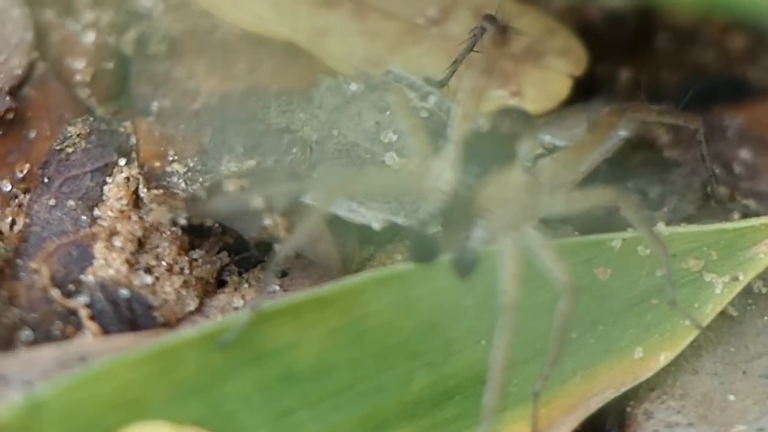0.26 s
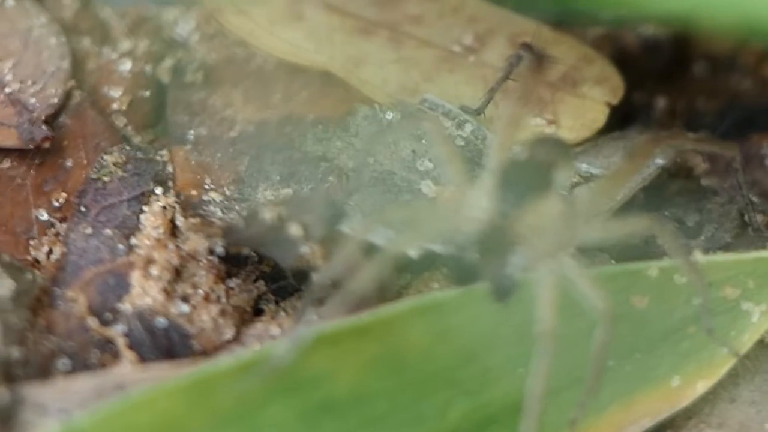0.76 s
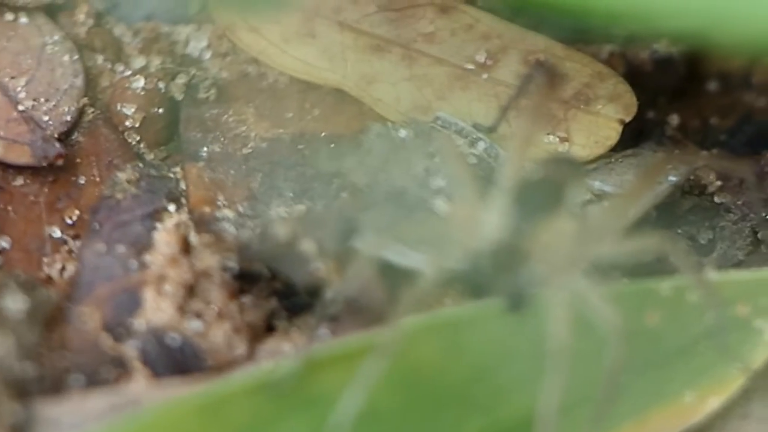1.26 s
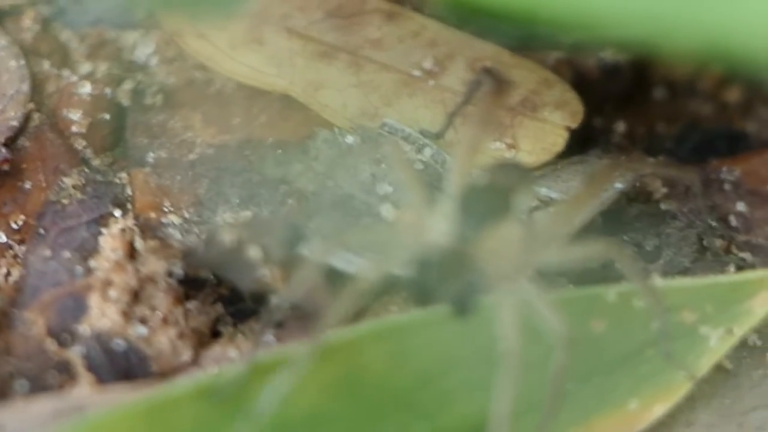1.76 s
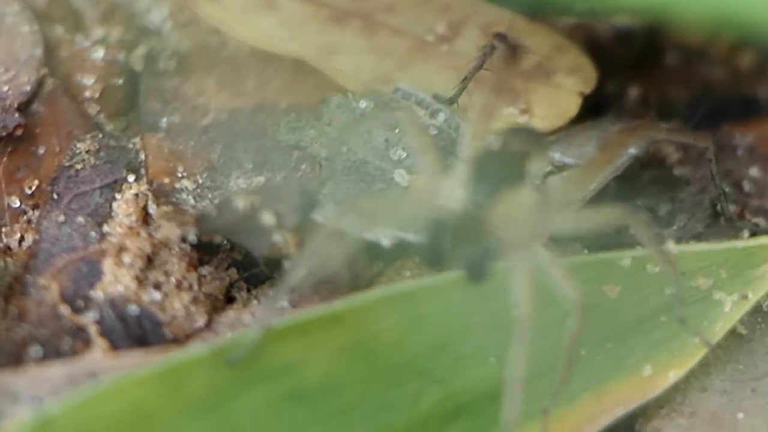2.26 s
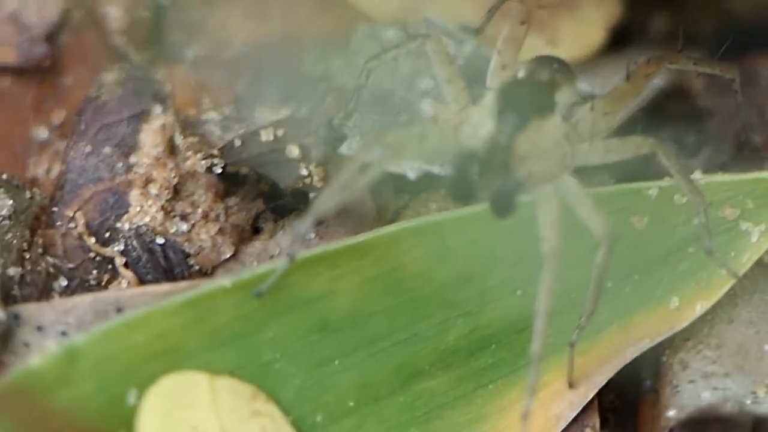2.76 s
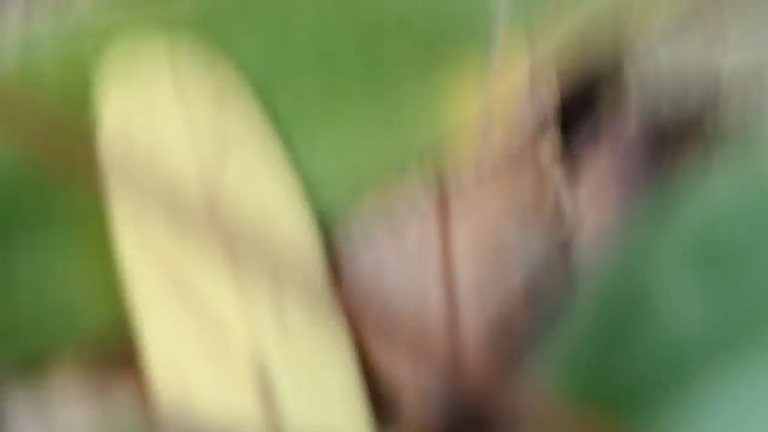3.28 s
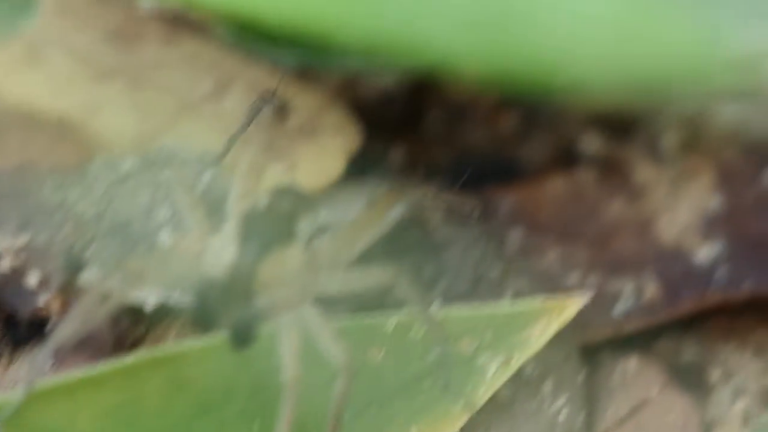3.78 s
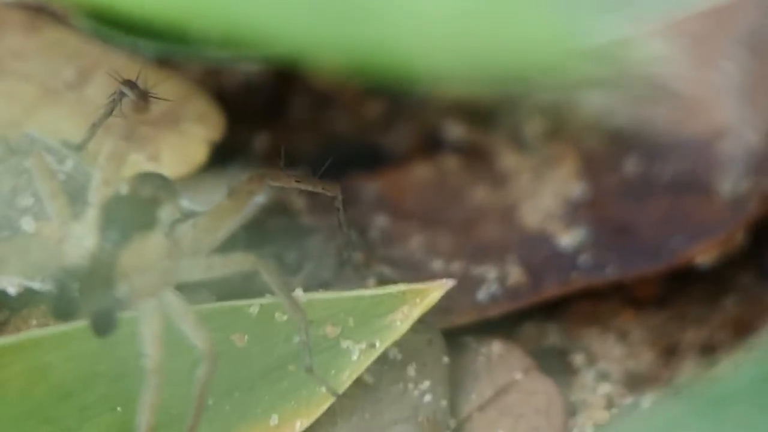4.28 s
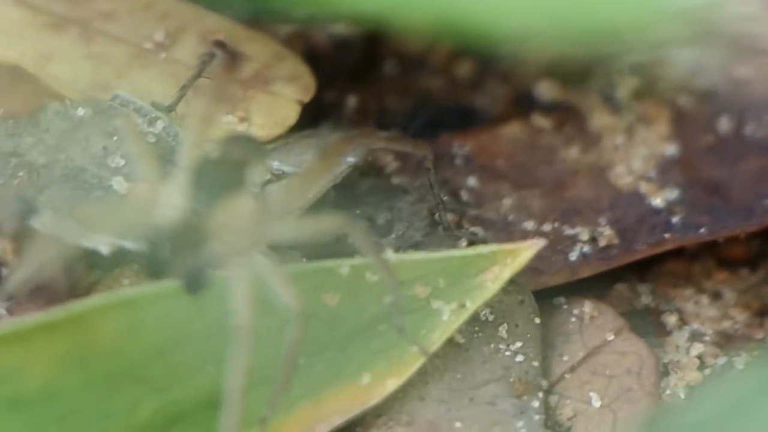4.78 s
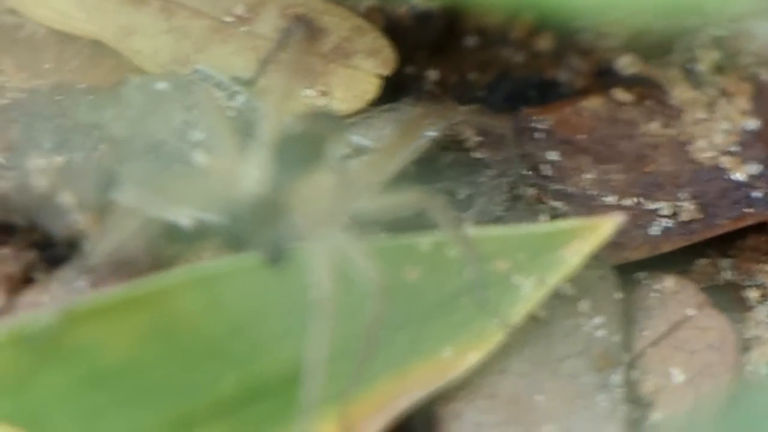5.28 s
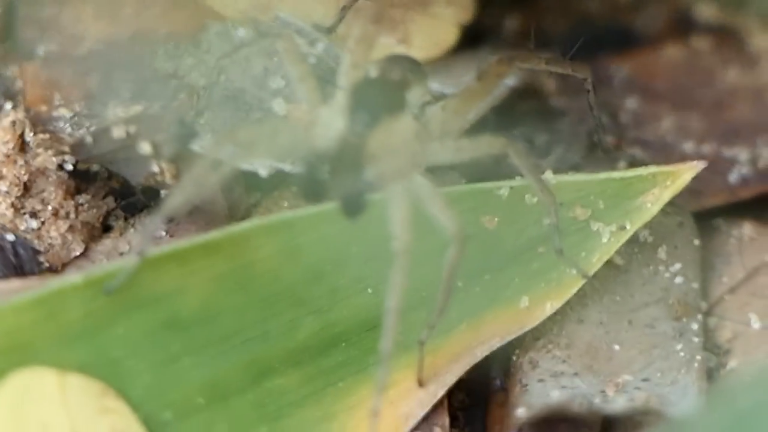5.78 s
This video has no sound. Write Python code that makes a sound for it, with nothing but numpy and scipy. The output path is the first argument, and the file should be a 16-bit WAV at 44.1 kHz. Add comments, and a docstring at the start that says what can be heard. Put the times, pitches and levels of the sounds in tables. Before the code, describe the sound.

Among leaf litter and trees, several layers of insects shimmer at high pitch without pause. Over them a mellow bird call keeps returning at a regular pace, slightly echoing. Cricket chirps open the scene and come back near the close. The camera body snaps, ticks and creaks very close to the microphone, mostly after three seconds, over low gentle wind puffs and a faint leafy hiss. The spider is silent.

```python
"""Three insect choirs shimmer at once, over a near cricket with paired falling chirps and a bird that
repeats a low five-note call. The choirs are noise pulsed by wing strokes; bird, cricket and two faint
short tones are sliding sines among echoing trees. The hand-held camera's plastic housing ticks and creaks
as cracks of noise through resonances, and its strap lug rings once as fading sines. Under it all light
wind rumbles and hums on the microphone, as shaped noise and low sines, with a hiss of far leaves."""
import sys
import numpy as np
from scipy import signal
from scipy.fft import rfft, irfft, next_fast_len
from scipy.io import wavfile
from scipy.ndimage import uniform_filter1d, map_coordinates

SR = 44100
rng = np.random.default_rng(int(sys.argv[2]) if len(sys.argv) > 2 else 0)


def file_out(sig):
    """Save sig as 16-bit WAV at sys.argv[1]."""
    # one column per channel
    cols = np.atleast_2d(sig).T
    # limit, then scale
    lim = np.clip(cols, -1, 1)
    pcm = np.round(lim * 32767).astype(np.int16)
    wavfile.write(sys.argv[1], SR, pcm)


N = 266364

# wing resonances, the relative colour of each choir: pitch_hz, level_db (per Hz)
LOW_WING_COLOUR = [(4000, -57), (4350, 2.5), (4750, 7), (5000, 15), (5250, 8), (5500, -32), (6000, -28)]
MAIN_WING_COLOUR = [(3180, -100.5), (5400, -13.5), (5830, -3), (6450, 2), (7120, 4.5), (7550, 1),
                    (7880, -3.5), (8000, -39), (8200, -44), (10700, -56), (18000, -120)]
HIGH_WING_COLOUR = [(4000, -40), (5000, -14), (8500, -18), (9120, 3.5), (9690, 6.5), (10200, 1.5),
                    (10800, -11.5), (14000, -58), (22000, -120)]
# swells of the low choir over its floor: centre_s, level_db
LOW_CHOIR_SWELLS = [(.2, -67), (.85, -65), (1.453, -64), (2.1, -72), (2.704, -67), (3.561, -66),
                    (4.24, -70), (5.021, -66), (5.747, -69)]
LOW_FLOOR_DB, SWELL_HALF_S = -65.5, .11
MAIN_DB = -52
# the high choir waxes and wanes around its middle level
HIGH_MIDDLE_DB, SWING_DB, SWING_PERIOD_S, CREST_S = -65.5, 2, 1.5, 1.1


def choirs():
    """Three kinds of insect: noise pulsed at a stroke rate, then coloured by the wing's resonance."""
    swells = bumps([(s, db, SWELL_HALF_S) for s, db in LOW_CHOIR_SWELLS])
    low = (amp(LOW_FLOOR_DB) + swells) * rush(LOW_WING_COLOUR, 3.0, wing_beat(150, 0.67, 0.94))

    main_gain = amp(MAIN_DB + 0.37 * wobble(8.9))
    main = main_gain * rush(MAIN_WING_COLOUR, 1.0, wing_beat(56.0, 1.0, 1.0))

    swing = np.cos(2 * np.pi * (np.arange(N) / SR - CREST_S) / SWING_PERIOD_S)
    high_gain = amp(HIGH_MIDDLE_DB + SWING_DB * swing + 0.37 * wobble(9.2))
    high = high_gain * rush(HIGH_WING_COLOUR, 0.94, wing_beat(272, 0.51, 1.3))
    return low + main + high


def wing_beat(rate_hz, depth_db, grain_db):
    """One near singer's almost steady stroke rate over the random teeth of the crowd."""
    phase = 2 * np.pi * np.cumsum(rate_hz * (1 + 0.0067 * wobble(2.7))) / SR
    return amp(depth_db * np.sin(phase) + grain_db * wobble(500))


# bird calls: first_note_s (its centre), level_db, tail_db (added per note after the second)
BIRD_CALLS = [(-0.082, -32.5, 1), (0.667, -33.5, 1), (1.436, -34, 1.5), (2.197, -32.5, 1),
              (2.962, -34.5, -0.5), (3.743, -34, 1), (4.521, -35, 1.2), (5.298, -33, -0.1)]
# the five notes: delay_s, level_db (added to the call), then the shape before variation:
# rise_s, fall_s, centre_hz, slide_hz_per_s, arch_hz (lost at the half-level ends)
FIVE_NOTES = [(0, -5, 0.019, 0.014, 1085, 303, 26), (.093, -1, 0.0062, 0.013, 1157, -6000, 14.5),
              (.14, -0.5, 0.0054, 0.0098, 1169, -5500, 15), (.184, -5, 0.006, 0.0078, 1159, -5500, 16.3),
              (.224, -12.5, 0.0073, 0.0049, 1098, -3000, 14.5)]
# after the fifth note: delay_s, level_db (added to that note), rise_s, fall_s, centre_hz,
# slide_hz_per_s, arch_hz
CLOSING_FLOURISH = [(.03, -15.5, 0.01395, .012, 1534, -4000, 22.3),
                    (.058, -13, .01, 0.008, 1288, -6000, 10.7)]
# a very faint short breathy tone before the third note: lead_s, level_db, rise_s, fall_s, centre_hz,
# slide_hz_per_s, arch_hz
FAINT_BLIP = (0.019, -57, .004, .005, 1560, 3000, 5)


def bird():
    """The throat whistles five notes, a little different each time, with a faint blip and a flourish."""
    spread = [.06, .06, .006, .09, .2]  # of rise, fall, pitch, slide and arch
    vary = 1 + spread * rng.standard_normal((len(BIRD_CALLS), len(FIVE_NOTES), 5))
    notes = []
    for c, (s, db, tail_db) in enumerate(BIRD_CALLS):
        for k, (delay, note_db, *shape) in enumerate(FIVE_NOTES):
            level = db + note_db + tail_db * max(k - 1, 0)
            notes.append((s + delay, level, *(shape * vary[c, k])))

    thirds, fifths = notes[2::len(FIVE_NOTES)], notes[len(FIVE_NOTES) - 1::len(FIVE_NOTES)]
    flourishes = [(s + delay, db + more_db, *shape)
                  for s, db, *_ in fifths for delay, more_db, *shape in CLOSING_FLOURISH]
    lead, *blip = FAINT_BLIP
    blips = [(s - lead, *blip) for s, *_ in thirds]
    return whistles(notes + flourishes + blips, overtone_db=-32.5, rough_db=1.9, breath_db=-31.5)


# chirps of two wing closures: time_s, level_db (midway between the two), gap_s (to the second),
# second_over_first_db, first_pitch_hz (where the first closure starts)
CRICKET_CHIRPS = [(-.024, -37, 0.019, -1, 4920), (0.081, -35.5, 0.02, 1, 4920),
                  (.191, -34.5, 0.024, 1, 4910), (0.323, -37, .026, 1.5, 4900),
                  (0.426, -34.5, 0.022, -0.5, 4950), (0.532, -34.5, 0.026, 0, 4980),
                  (0.653, -34, 0.022, 1.5, 4914), (5.355, -53, 0.024, -4, 4480),
                  (5.466, -46, 0.02, -1, 4630), (5.593, -38.5, 0.017, 2.5, 4730),
                  (5.758, -38.5, 0.023, 3, 4720)]
# the wing springs back, rising: delay_s, level_db (added to the closure), rise_s, fall_s,
# offset_hz (from the closure's starting pitch), slide_hz_per_s, arch_hz
WING_OPENING = (.022, -8.5, .005, .004, -170, 30007, 4.5)
# a stronger second closure starts higher; the pitch falls ever faster
HZ_PER_DB, SAG_HZ_PER_S2 = 33.5, 2600000
# under this pitch the wing sounds ever less
WING_FLOOR_HZ, FADE_DB_PER_HZ = 4200, .04


def cricket():
    """Each wing closure slows down, so the chirp falls in pitch and drops out of the wing's resonance."""
    track, t = np.zeros(N + 2 * SR), np.arange(int(0.024 * SR)) / SR
    closures = []
    for s, db, gap, more_db, hz in CRICKET_CHIRPS:
        closures.append((s, db - .5 * more_db, hz))
        closures.append((s + gap, db + .5 * more_db, hz + more_db * HZ_PER_DB))

    swell = (1 - np.exp(-t / 0.003)) ** 2 * amp(-60 * (t / 0.025) ** 3.2)
    for s, db, hz in closures:
        pitch = hz - SAG_HZ_PER_S2 * t * t
        fade_db = FADE_DB_PER_HZ * np.minimum(pitch - WING_FLOOR_HZ, 0)
        phase = 2 * np.pi * (hz * t - SAG_HZ_PER_S2 * t ** 3 / 3)
        add(track, s - .001, amp(db + fade_db) * swell * np.sin(phase))

    delay, more_db, rise, fall, off_hz, *glide = WING_OPENING
    openings = [(s + delay, db + more_db, rise, fall, hz + off_hz, *glide) for s, db, hz in closures]
    return track + whistles(openings, overtone_db=-80, rough_db=-0.5, breath_db=-80)


# housing ticks: snap_s, knock_db (peak at 1.7-4.1 kHz), thud_db, click_db, fizz_db (all three
# relative to the knock), burst_t60_s, bright_resonance_hz
HOUSING_TICKS = [(0.3092, -25, -3, 13.5, 3.5, 0.016, 4800), (1.0608, -57, 6.5, 9, -2, 0.015, 5900),
                 (1.4726, -48, 3, -2, -10, 0.032, 5920), (1.7781, -49.5, 5, -2, -8, 0.071, 5840),
                 (3.079, -16, -15.5, 2, 2, 0.013, 5640), (3.281, -40.5, 3.5, -5, -4, 0.016, 5900),
                 (3.2916, -39.5, -5, 8.5, 8.5, 0.039, 4860), (3.2944, -36, 2.5, 10.5, -2, 0.0064, 5500),
                 (3.302, -44, -5, 7, 3, 0.033, 5940), (3.361, -59, 6, -7, -8, .02, 5900),
                 (3.417, -40, 3.5, -7, -15, 0.022, 5900), (3.428, -49, -14, -6, 11, 0.039, 6800),
                 (3.7048, -19, -18.5, -1, -1, 0.015, 5900), (3.8094, -43.5, -1.5, -16, -12, 0.037, 6110),
                 (4.1467, -46, -10, 3, -9, 0.029, 5800), (4.1763, -53, -8, -5, -5, 0.037, 5840),
                 (4.243, -50.5, -1.5, -5, -9, 0.025, 5900), (4.4891, -18, -19, 1.5, 0, 0.014, 5780),
                 (4.7367, -25.5, -8, 12.5, 5.5, 0.042, 5830), (4.7745, -34.5, -4, 11, 3.5, 0.04, 6000),
                 (4.789, -47.5, -4, 5, -1, 0.11, 5950), (4.855, -48.5, 2.5, 5, -7, 0.031, 5950),
                 (5.047, -49.5, 0, -4, -6, 0.19, 5940), (5.2144, -38, -3, 13.5, 14, 0.039, 5380),
                 (5.254, -45.5, -4, 12.5, 4, 0.12, 5930), (5.338, -41.5, -1.5, 15.5, 10, 0.063, 5690),
                 (5.809, -49, -3, 11.5, 8, 0.033, 5050), (5.9075, -40.5, -9.5, 14, 6, 0.045, 6300),
                 (5.9542, -45, -4.5, 7.5, -1, 0.14, 6100), (5.973, -56.5, 9.5, -5, -5, 0.075, 5900)]
# housing resonances: pitch_hz, width_hz, level_db
HOUSING_MODES = [(930, 530, 7), (1610, 370, 6.5), (2640, 470, 12.5), (3060, 650, 14.5), (3700, 1400, 7),
                 (7360, 1200, 3), (9360, 700, -3), (11800, 4700, -2.5)]
# thud, knock, click, fizz: low_hz, high_hz, t60_share (of the burst's t60)
TICK_BANDS = [(450, 1700, 1.4), (1700, 4100, 1), (4100, 8500, .8), (8500, 15000, .7)]
# stereo width of the ticks: pitch_hz, side_db (relative to mid)
TICK_WIDTH = [(300, -24), (1200, -21), (2500, -33), (5000, -38), (8500, -17), (12000, -7.5)]
# the bright resonance, whose pitch depends on where the plastic gives
BRIGHT_WIDTH_HZ, BRIGHT_DB = 620, 21
# a soft rise leads into each snap; then the level of the snap over the crackle
LEAD_IN_S, LEAD_IN_DB, SNAP_DB = .003, -17, 14
# the hollow of the body: pitch, level relative to the thud, ring over the burst's t60
HOLLOW_HZ, HOLLOW_DB, HOLLOW_RING = 835, -13, 1.8


def housing():
    """Each tick rises softly, snaps and crackles on, ringing the plastic, weighted by where it strikes."""
    track, t = np.zeros(N + 2 * SR), np.arange(int(.1 * SR)) / SR - LEAD_IN_S
    rows = np.array(HOUSING_TICKS + slips(count=3))
    s, db, thud_db, click_db, fizz_db, t60, bright_hz = rows.T[:, :, None]

    noise, patches = np.moveaxis(rng.standard_normal((len(s), 2, len(t))), 1, 0)
    lead_in = np.where(t < 0, amp(LEAD_IN_DB - 12 * np.abs(t) / LEAD_IN_S), 1)
    cracks = noise * amp(4.6 * unit(uniform_filter1d(patches, 40))) * lead_in
    cracks[:, np.argmax(t >= 0)] = amp(SNAP_DB)

    ticks, t = 0, np.maximum(t, 0)
    ringing = resonances(HOUSING_MODES + [(bright_hz, BRIGHT_WIDTH_HZ, BRIGHT_DB)])
    for (lo, hi, share), level in zip(TICK_BANDS, (thud_db, 0, click_db, fizz_db)):
        # treble dies first; a weak tail lasts longer
        dying = amp(-60 * t / (share * t60)) + amp(-35.0 - 60 * t / (8.6 * t60))
        ring = filtered(cracks * dying, ringing)
        band = signal.butter(3, (lo, hi), "band", fs=SR, output="sos")
        part = signal.sosfilt(band, ring)
        ticks = ticks + amp(db + level) * part / np.abs(part).max(axis=1, keepdims=True)

    # the whole body jolts
    jolt = amp(db + thud_db - 11.0) * np.sin(2 * np.pi * 330 * t) * amp(-60 * t / 0.013)
    hollow_db = db + thud_db + HOLLOW_DB - 60 * t / (HOLLOW_RING * t60)
    ticks = ticks + jolt + amp(hollow_db) * np.sin(2 * np.pi * HOLLOW_HZ * t)
    for start, tick in zip(s[:, 0], ticks):
        add(track, start - LEAD_IN_S, tick)

    mid = track[SR:SR + N]
    # treble reaches the left port more
    side = filtered(mid, lambda hz: amp(along(TICK_WIDTH, hz)) * np.exp(.9j))
    return mid + np.array([side, -side])


# runs of faint slips: start_s, length_s, knock_db (of the strongest possible slip)
CREAK_RUNS = [(3.268, 0.04, -55), (3.818, 0.026, -52), (4.104, 0.023, -67), (5.27, 0.032, -57)]
# a faint slip: thud_db, click_db, fizz_db (relative to its knock), burst_t60_s, bright_resonance_hz
FAINT_SLIP = (2, -6, -1, 0.27, 5900)


def slips(count):
    """Each creak is a few faint slips at uneven moments, each up to 6 dB down."""
    draw = rng.random((len(CREAK_RUNS), count, 2))
    return [(s + length * (k + late) / count, db - 6 * softer, *FAINT_SLIP)
            for (s, length, db), row in zip(CREAK_RUNS, draw)
            for k, (late, softer) in enumerate(row)]


# modes of the metal strap lug: pitch_hz, level_db (at the strike, before flutter), t60_s
LUG_MODES = [(840, -61.5, .3), (2060, -62, 0.45), (2600, -63, 0.35), (2923, -64, 0.35)]
LUG_STRIKE_S = .309


def lug():
    """The strap lug, struck once, rings on faintly, each mode fluttering on its own."""
    track, t = np.zeros(N + 2 * SR), np.arange(SR // 2) / SR
    for hz, db, t60 in LUG_MODES:
        level_db = db - 60 * t / t60 + 4 * wobble(60)[:len(t)]
        add(track, LUG_STRIKE_S, amp(level_db) * np.sin(2 * np.pi * hz * t))
    return track[SR:SR + N]


# faint short tones with a rough flutter: centre_s, level_db (before flutter), rise_s, fall_s,
# centre_hz, slide_hz_per_s, arch_hz
FAINT_TONES = [(3.8, -68, .03, 0.045, 3036, 0, 21.4), (5.775, -74, .02, 0.025, 3400, 3000, 18)]


def faint_tones():
    """Faint short arched tones with a rough flutter and some breath."""
    return whistles(FAINT_TONES, overtone_db=-46, rough_db=6, breath_db=-24)


# rumble over time: time_s, level_db (before its slow wobble)
RUMBLE_LEVEL = [(0, -55.5), (1.7, -57), (2.9, -54.5), (3.6, -56), (4.1, -54.5), (5.4, -58.5), (6.04, -54.5)]
# far leaves and air over time: time_s, level_db
LEAF_LEVEL = [(0.0, -60.5), (0.57, -64), (2.07, -64.5), (4.7, -62.5), (6.04, -62.5)]
# relative colours of the wind: pitch_hz, level_db (per Hz)
RUMBLE_COLOUR = [(13, -71), (22, -24), (48, -28.5), (86, -8.5), (113, -5.5), (152, -1), (262, -9.5),
                 (372, -21.5), (400, -21), (520, -55), (880, -120)]
PUFF_COLOUR = [(110, -28), (150, -8.5), (195, -9.5), (250, -12), (330, -41), (450, -80)]
LEAF_COLOUR = [(200, -15), (400, 12.5), (700, 9), (1300, 12), (2000, 6), (2500, -0.5), (3700, -1.5),
               (4400, 2), (8300, 1), (11000, -1.5), (14500, -3.5), (15700, -10), (16600, -25)]
# puffs: centre_s, level_db (before flutter), half_length_s
WIND_PUFFS = [(.1, -71, 0.17), (1.87, -54.5, 0.18), (2.6, -54.5, 0.15), (3.15, -59.5, 0.21),
              (4.15, -55, 0.34), (4.7, -61, 0.36), (6.04, -63, 0.097)]
# a low hum in the stronger puffs: centre_s, level_db (before flutter), rise_s, fall_s, centre_hz,
# slide_hz_per_s, arch_hz
PUFF_HUMS = [(1.76, -49.5, .05, 0.035, 220, -8, 8.5), (1.93, -50, 0.06, 0.1, 190, -3, -4),
             (2.58, -53, 0.1007, 0.18, 190, 111, -2.5), (4.12, -51, .1, 0.13, 196, 81, -4.5)]


def wind():
    """Steady rumble, humming puffs across the microphone port and the hiss of far leaves."""
    rumble = amp(curve(RUMBLE_LEVEL) + 0.16 * wobble(8.9)) * rush(RUMBLE_COLOUR, 1.6)
    puffs = bumps(WIND_PUFFS) * amp(1.8 * wobble(8)) * rush(PUFF_COLOUR, 1.37)
    hum = whistles(PUFF_HUMS, overtone_db=-50, rough_db=3.0, breath_db=-60)[SR:SR + N]
    leaves = amp(curve(LEAF_LEVEL)) * rush(LEAF_COLOUR, 2.73)
    return rumble + puffs + hum + leaves


# decay of the echoes: pitch_hz, t60_s
TREE_DECAY = [(300, 1), (1100, 0.32), (5000, 0.22), (12000, 0.081)]


def trees(x, wet_db, gap, wide):
    """Direct sound plus scattered echoes from gap seconds on; the scatter changes from moment to moment."""
    out, late = np.zeros((2, len(x) + SR)), round(gap * SR)
    for i in range(0, len(x), 8192):
        hz, t, z = signal.stft(rng.standard_normal((2, SR // 2)), SR, nperseg=256)
        decay = amp(-60 * t / along(TREE_DECAY, hz)[:, None])
        mid, side = signal.istft(z * decay, SR, nperseg=256)[1]
        tail = (mid + wide * np.array([side, -side])) / np.linalg.norm(mid)
        echo = signal.fftconvolve(x[None, i:i + 8192], tail, axes=1)
        out[:, i + late:i + late + echo.shape[1]] += echo
    return (x + amp(wet_db) * out[:, :len(x)])[:, SR:SR + N]


# airy edge of the whistles, as in the bird's throat: pitch_hz, width_hz, level_db (passed twice)
BREATH_MODES = [(1520, 230, 2.5), (2070, 170, 8)]


def whistles(rows, overtone_db, rough_db, breath_db):
    """Sliding, arched sines under a rounded swell, with a weak octave, a husky flutter and a little breath."""
    tone, effort = np.zeros((2, N + 2 * SR))
    for s, db, rise, fall, hz, slide, arch in rows:
        t = np.arange(-2.5 * rise, 2.2 * fall, 1 / SR)
        u = np.where(t < 0, t / rise, t / fall)
        phase = 2 * np.pi * np.cumsum(hz + slide * t - arch * u * u) / SR
        swell = amp(db) * .5 ** (np.abs(u) ** 1.87)
        # the octave stands out at the soft ends of held notes
        octave_gain = amp(overtone_db - abs(slide) / 1200) * 1.8 ** (u * u)
        add(tone, s + t[0], swell * (np.sin(phase) + octave_gain * np.sin(2 * phase)))
        add(effort, s + t[0], swell)
    flutter = np.pad(amp(rough_db * wobble(130)), SR, constant_values=1)
    noise = rng.standard_normal(len(tone))
    air = unit(filtered(noise, lambda f: resonances(BREATH_MODES)(f) ** 2))
    return tone * flutter + amp(breath_db) * effort * air


# stereo width of the noise layers: pitch_hz, side_db (relative to mid)
NOISE_WIDTH = [(25, -9), (60, -20), (140, -38.5), (450, -15), (1300, -16), (2800, -27), (7000, -24.5),
               (8800, -14.5), (11000, -4), (15000, -5.5)]


def rush(colour, patchy_db, strokes=1):
    """Stereo noise of rms 1 with patches of random gain, pulsed by strokes before its colour."""
    z = signal.stft(rng.standard_normal((2, N)) * strokes, nperseg=512)[2]
    field = rng.standard_normal(z.shape[1:])
    field = uniform_filter1d(uniform_filter1d(field, 6, 0), 12, 1)
    pair = signal.istft(z * amp(patchy_db * unit(field)), nperseg=512)[1][:, :N]

    def mid_and_side(hz):
        """Gains of the colour for mid and side."""
        mid_db = along(colour, hz)
        return amp([mid_db, mid_db + along(NOISE_WIDTH, hz)])

    mid, side = filtered(pair, mid_and_side)
    return unit(np.array([mid + side, mid - side]))


def resonances(modes):
    """Causal response of (pitch_hz, width_hz, level_db) modes that alternate in sign."""
    def response(f):
        """Sum of the modes at frequencies f."""
        return sum((-1) ** k * amp(db) * 1j * f * width / (hz * hz - f * f + 1j * f * width)
                   for k, (hz, width, db) in enumerate(modes))
    return response


def bumps(rows):
    """Sum of bell-shaped swells (centre_s, level_db, half_length_s)."""
    t = np.arange(N) / SR
    return sum(amp(db) * .5 ** (((t - s) / half) ** 2) for s, db, half in rows)


def amp(db):
    """dB to gain."""
    return 10 ** (np.asarray(db) / 20)


def unit(x):
    """Scaled to rms 1."""
    return x / np.sqrt(np.mean(x ** 2) + 1e-20)


def along(points, hz):
    """Value at hz between (pitch_hz, value) points, on a log axis."""
    f, v = np.transpose(points)
    return np.interp(np.log(hz + 1), np.log(f + 1), v)


def curve(points):
    """One value per sample between (time_s, value) points."""
    s, v = np.transpose(points)
    return np.interp(np.arange(N) / SR, s, v)


def wobble(rate):
    """A smooth random curve, rate knots a second."""
    knots = rng.standard_normal(int(N * rate / SR) + 4)
    return map_coordinates(knots, [np.arange(N) * rate / SR])


def filtered(x, response):
    """x times a complex response of frequency."""
    n = x.shape[-1]
    m = next_fast_len(n + 8192)
    return irfft(rfft(x, m) * response(np.fft.rfftfreq(m, 1 / SR)), m)[..., :n]


def add(track, s, sound):
    """Mixes a sound in from time s on; the track starts one second early."""
    track[round((s + 1) * SR):][:len(sound)] += sound


def scene():
    """Singers and faint tones among the trees, the camera body and the wind."""
    singer = trees(bird(), wet_db=-15.5, gap=0.018, wide=0.054)
    chirper = trees(cricket(), wet_db=-6, gap=0.011, wide=0.034)
    faint = trees(faint_tones(), wet_db=-4, gap=.005, wide=.06)
    return choirs() + singer + chirper + housing() + lug() + faint + wind()


TOP_HZ = 16500


def record(dry):
    """The camera keeps nothing above its band limit."""
    return filtered(dry, lambda hz: hz < TOP_HZ)


dry = scene()
out = record(dry)
file_out(out)
```